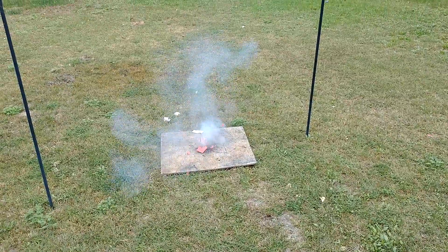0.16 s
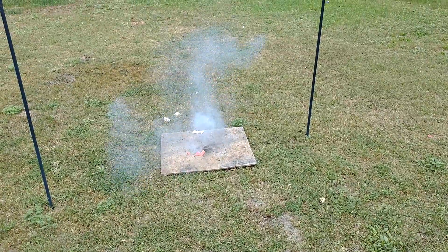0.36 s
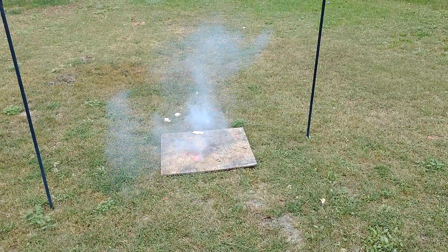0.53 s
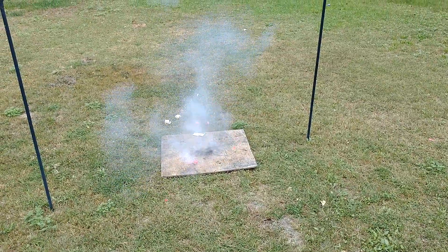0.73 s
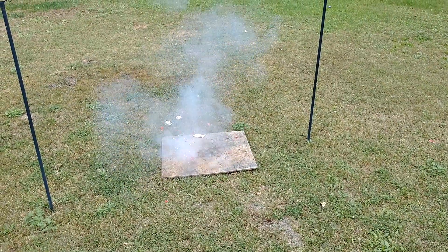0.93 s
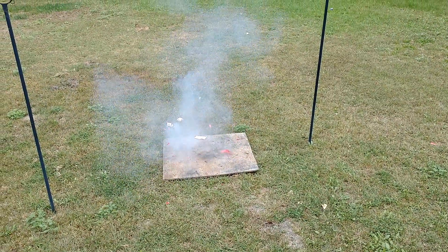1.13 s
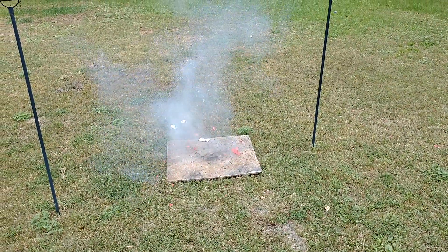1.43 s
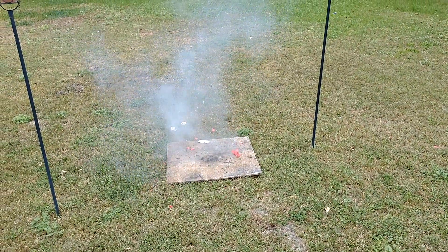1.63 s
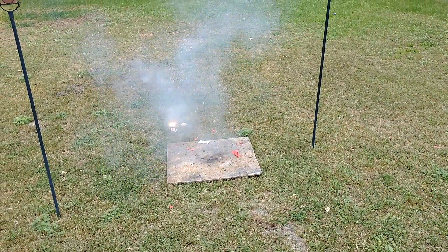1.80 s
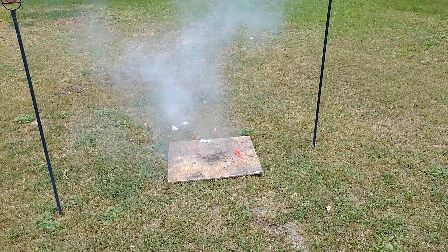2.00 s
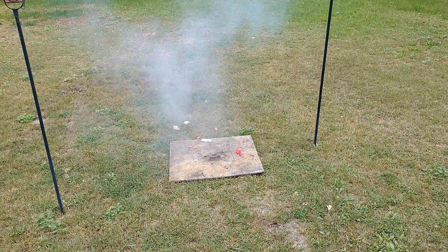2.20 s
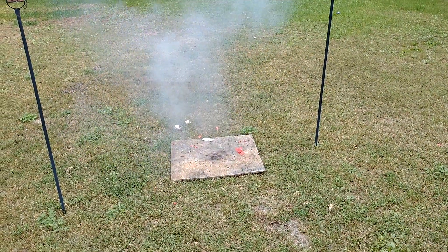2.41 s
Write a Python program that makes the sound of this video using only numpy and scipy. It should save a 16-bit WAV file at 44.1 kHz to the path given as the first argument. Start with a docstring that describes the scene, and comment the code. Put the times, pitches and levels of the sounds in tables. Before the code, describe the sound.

Firecrackers go off on a board in a grassy yard, about twenty sharp bangs in uneven clusters, thinning out after one second and stopping at two; close hand-held stereo microphone overloads, short echoes and fading tail.

```python
"""Firecracker string in a yard

A string of firecrackers goes off on a board on a lawn, a few metres from a hand-held two-port microphone.
Each blast is a pressure pulse with a lawn bounce and noisy rattle, flattened as it overloads the ports.
Walls and fences answer with short noise slaps, and the yard rings on in dying noise bands over faint air and wind.
The recorder makes stereo by taking a delayed copy of each port from the other."""
import sys
import numpy as np
from scipy import signal
from scipy.io import wavfile
from scipy.ndimage import uniform_filter1d

SR = 44100
rng = np.random.default_rng(int(sys.argv[2]) if len(sys.argv) > 2 else 0)


def magnitude_from_level(level_db):
    """Linear magnitude for a level in decibels (20 dB per decade)."""
    exponent = np.asarray(level_db, float) / 20
    return 10 ** exponent


def int16_out(signal):
    """Quantize to a 16-bit WAV file."""
    q = np.round(np.clip(np.atleast_2d(signal).T, -1, 1) * 32767)
    wavfile.write(sys.argv[1], SR, q.astype(np.int16))


N = 112454
RUN_IN = 4410  # samples rendered ahead of time zero, then cut off

# Firecracker blasts: (time [s], charge level [dB], height at the overloaded ports [dB],
# shove on both ports [amplitude], shove on left against right [amplitude])
BLASTS = [(-0.03, -15, 29, 0, 0), (0.2327, -20.5, -4.5, 0.043, 0.052), (0.2411, -23.5, -7, -0.085, 0.052),
          (0.367, -18.5, -6, 0.0012, 0.031), (0.485, -21.5, -6, 0.064, -0.045),
          (0.542, -16.5, -12.5, 0.052, -0.085), (0.56, -22, -5, -0.047, 0.015),
          (0.6281, -16.5, -7.5, -0.02, -0.02), (0.6572, -15.5, -10.5, -0.017, -0.096),
          (0.812, -12, -7.5, -0.013, -0.066), (0.957, -31, -2, -0.032, -0.028),
          (0.9698, -17, -10, -0.045, 0.065), (0.997, -18.5, -10.5, -0.045, -0.01),
          (1.0231, -17, -10, -0.035, 0.0063), (1.2415, -18, -7, -0.025, 0.016),
          (1.2635, -25, -6, 0.077, 0.039), (1.502, -19, -7, 0.15, 0.14),
          (1.7986, -16.5, -9, -0.037, -0.063), (1.81, -27.5, 0.5, 0.094, 0.04),
          (1.9325, -30, -4, 0.049, -0.064), (2.0004, -28, -3, -0.079, 0.019)]


def band(x, low_hz, high_hz):
    """Band-pass."""
    return signal.sosfilt(signal.butter(2, [low_hz, high_hz], "band", fs=SR, output="sos"), x)


def rms_one(x):
    """Scale to an rms of 1 over all channels."""
    return x / np.sqrt(np.mean(x ** 2) + 1e-20)


def at_hz(points, hz):
    """Read a table on a log-frequency axis."""
    table_hz, values = np.transpose(points)
    return np.interp(np.log(hz), np.log(table_hz), values)


def late(x, s):
    """Delay by s seconds, reading between samples."""
    n = np.arange(len(x))
    return np.interp(n - s * SR, n, x, left=0)


def silence():
    """Empty two-port track, run-in included."""
    return np.zeros((2, N + RUN_IN))


def clock(length_s):
    """Sample times in seconds."""
    return np.arange(int(length_s * SR)) / SR


def add(out, piece, s):
    """Mix a piece in at time s."""
    i = RUN_IN + int(round(s * SR))
    out[:, i:i + piece.shape[1]] += piece[:, :out.shape[1] - i]


def dying(power, t60):
    """Power that dies 60 dB in t60 seconds."""
    return signal.lfilter([1], [1, -magnitude_from_level(-120 / (t60 * SR))], power + 1e-18)


def wind():
    """A faint low rumble: band-passed noise, unrelated at the two ports."""
    return magnitude_from_level(-83.5) * rms_one(band(rng.standard_normal((2, N + RUN_IN)), 50.4, 151))


def yard():
    """Third-octave noise bands: near scatter and far tail fed by every charge, over the quiet air."""
    # Spectra of near scatter, far tail and quiet air: (frequency [Hz], relative level [dB])
    near_tone = [(100, -17.5), (300, 3), (800, -3.5), (1500, 1.5), (3000, 1.5), (6000, -11), (10000, -16),
                 (16000, -7.5)]
    far_tone = [(100, -21.5), (300, -13.5), (800, -5), (1500, -2), (3000, 6), (6000, 6), (10000, 6.5),
                (16000, -0.5)]
    air_tone = [(60, 11), (150, 5.5), (400, -13), (800, 7.5), (1500, -5.5), (3000, -13.5), (6000, -12),
                (16000, -20.5)]
    # Decay of the far tail: (frequency [Hz], time to fall 60 dB [s])
    far_decay = [(100, 2.4), (300, 2.4), (800, 1.1), (1800, 1.5), (4000, 0.72), (8000, 0.48), (14000, 0.63)]
    # Correlation between the ports: (frequency [Hz], likeness [0-1])
    port_likeness = [(100, .95), (400, 0.78), (800, 0), (1600, 0), (3000, 0), (8000, 0.2)]
    near_db, far_db, air_db = -8, -25, -59
    near_hold_s, near_t60_s = 0.025, 0.052
    swell_s, swell_db, swell_cut_hz = 0.067, 4, 1570
    patch_db, patch_step = 0.8, 800  # level drift of the far tail, in steps of this many samples

    size = N + RUN_IN
    charge = np.zeros((1, size))
    for s, charge_db, *_ in BLASTS:
        add(charge, np.array([[magnitude_from_level(2 * charge_db)]]), s + 0.0027)
    charge = charge[0]

    # Near scatter holds level, then dies fast
    hold = int(near_hold_s * SR)
    held = np.maximum(np.convolve(charge, np.ones(hold))[:size], 0)
    near_power = held + dying(late(charge, hold / SR), near_t60_s)
    # The tree line answers later and duller
    swell = magnitude_from_level(2 * swell_db) * uniform_filter1d(late(charge, swell_s), size=2001)

    out = silence()
    edges = 45 * 2 ** np.arange(0, 8.7, 1 / 3)
    white = rng.standard_normal((2, 2, size))
    patch_at = np.arange(0, size, patch_step)
    for k, (low, high) in enumerate(zip(edges, edges[1:])):
        hz = np.sqrt(low * high)
        mid, side = band(white[k % 2], low, high)  # neighbouring bands use different noise
        alike = at_hz(port_likeness, hz)
        patches = np.interp(np.arange(size), patch_at, rng.standard_normal(len(patch_at)))
        fed = charge + swell / (1 + (hz / swell_cut_hz) ** 2)
        far_level = far_db + at_hz(far_tone, hz) + patch_db * patches
        power = near_power * magnitude_from_level(2 * (near_db + at_hz(near_tone, hz)))
        power = power + dying(fed, at_hz(far_decay, hz)) * magnitude_from_level(2 * far_level)
        power = power + magnitude_from_level(2 * (air_db + at_hz(air_tone, hz)))
        ports = np.sqrt(1 + alike) * mid + np.sqrt(1 - alike) * side * [[1], [-1]]
        out = out + np.sqrt(power) * ports
    return out


def far_slaps():
    """Farther surfaces, which only some crackers reach, return single short noise bursts."""
    # Far echoes: (time [s], level [dB], upper band edge [Hz])
    far_echoes = [(0.5334, -64, 5940), (0.8584, -44, 7100), (.868, -42, 5030), (1.0692, -37, 9000),
                  (1.32, -40, 2340), (1.549, -39, 6560), (1.615, -44.5, 2380), (1.852, -39, 3860),
                  (1.977, -46, 1930), (2.048, -48, 1930)]
    out, t = silence(), clock(0.006)
    gate = np.clip((0.003 - t) / 0.00017, 0, 1)  # 3 ms burst, quick fade at the end
    for s, db, high_hz in far_echoes:
        first, second = rng.standard_normal((2, len(t)))
        # Left port mixes two noises, right port has only the first
        noise = np.array([first + 0.5 * second, 1.5 * first])
        burst = band(noise * gate, 604, high_hz)
        add(out, magnitude_from_level(db) * rms_one(burst), s)
    return out


def slaps():
    """The near wall and fence return each blast as short band-passed bursts of randomly varied strength."""
    # Near echoes, one row per delay: (level [dB], length [s], lower band edge [Hz], upper band edge [Hz])
    near_echoes = [(-9.5, 0.001, 1500, 8000), (-12.5, 0.00054, 1000, 6200), (-1.5, 0.0028, 450, 2820)]
    # Echo delays after the blast: (delay [s])
    echo_delays = [.0125, .0185, .0217]
    soft_s, spread_db = 0.0006, 1.5
    out, t = silence(), clock(0.006)
    for s, charge_db, *_ in BLASTS:
        for delay, (db, length, low_hz, high_hz) in zip(echo_delays, near_echoes):
            shared, own = rng.standard_normal(len(t)), rng.standard_normal((2, len(t)))
            gate = np.clip(np.minimum(length - t, t) / soft_s, 0, 1)
            burst = band((0.57 * shared + own) * gate, low_hz, high_hz)
            burst = burst / np.sqrt(2 * (high_hz - low_hz) / SR)  # even out the bandwidths
            strength_db = charge_db + db + spread_db * rng.standard_normal()
            add(out, burst * magnitude_from_level(strength_db), s + delay)
    return out


def shoves():
    """The overloaded ports swing slowly off centre, together and against each other, then recover."""
    shove_s, swing_hz, recover_hz = 0.0046, 135, 59.6
    both_db, against_db = 5.5, 3.5
    out, t = silence(), clock(shove_s)
    swing = np.sin(2 * np.pi * swing_hz * t) * np.clip((shove_s - t) / 0.00027, 0, 1)
    for s, _, _, both, against in BLASTS:
        opposed = against * magnitude_from_level(against_db) * np.array([[1], [-1]])
        add(out, swing * (both * magnitude_from_level(both_db) + opposed), s)
    return signal.sosfilt(signal.butter(2, recover_hz, "high", fs=SR, output="sos"), out)


def blasts():
    """Pressure pulse with suction, a weaker, duller lawn bounce and port rattle, flattened by overload."""
    push_s, left_leads_s = 0.00024, 0.00008  # push lasts this long before the suction
    bounce_s, bounce_db, grass_hz = 0.002654, -10, 1597
    rattle_s, rattle_db, wobble_db = 0.0046, -5, -4
    mean_charge_db, rattle_per_db, second_per_db = -17, 0.99, 0.6  # second: extra slope near the bounce
    overdrive = 2
    out, t = silence(), clock(0.008)

    pulse = (1 - t / push_s) * np.exp(-t / push_s)
    bounce = signal.lfilter(*signal.butter(2, grass_hz, fs=SR), late(pulse, bounce_s))
    pulse = pulse + magnitude_from_level(bounce_db) * bounce
    pulses = np.array([pulse, late(pulse, left_leads_s)])

    # Rattle swells with the direct pulse and again with the bounce
    gate = np.clip((rattle_s - t) / 0.0003, 0, 1) * (0.62 + 0.68 * np.cos(2 * np.pi * t / bounce_s))
    slope = rattle_per_db + second_per_db * (t > bounce_s / 2)
    for s, charge_db, height_db, _, _ in BLASTS:
        shared, own = rng.standard_normal(len(t)), rng.standard_normal((2, len(t)))
        rattle = rms_one(band(0.39 * shared + own, 600, 15000))
        wobble = rms_one(band(own, 185, 740))
        excess_db = min(charge_db - mean_charge_db, 3.0)
        rattle = gate * (rattle + magnitude_from_level(wobble_db) * wobble) * magnitude_from_level(rattle_db + slope * excess_db)
        add(out, magnitude_from_level(height_db) * np.tanh(overdrive * (pulses + rattle)), s)
    return out


def scene():
    """Sound at the two ports."""
    return (wind() + yard() + far_slaps() + slaps() + shoves() + blasts())[:, RUN_IN:]


def roll_off(x):
    """The treble ends steeply here."""
    return signal.sosfilt(signal.butter(12, 17040, fs=SR, output="sos"), x)


def record(dry):
    """Each side loses a delayed, dulled share of the other port; low cut, bass lift, soft ceiling, top cut."""
    # Share taken from the other port, one row per side: (share [0-1])
    cross_share = [
        [0.59],
        [0.7],
    ]
    port_gap_s, bass_lift_hz, bass_lift_db, ceiling = 0.000461, 400, 6, 1.7
    crossed = [late(dry[1], port_gap_s), late(dry[0], port_gap_s)]
    crossed = signal.lfilter(*signal.butter(1, 5500, fs=SR), crossed)
    x = dry - np.array(cross_share) * crossed
    x = signal.lfilter(*signal.butter(2, 62, "high", fs=SR), x)
    r = np.exp(-2 * np.pi * bass_lift_hz / SR)
    bass = signal.lfilter([1 - r], [1, -r], x)
    x = x + (magnitude_from_level(bass_lift_db) - 1) * bass
    x = ceiling * np.tanh(x / ceiling)
    x = signal.sosfilt(signal.cheby2(12, 50, 16800, fs=SR, output="sos"), x)
    return roll_off(x)


dry = scene()
out = record(dry)
int16_out(out)
```